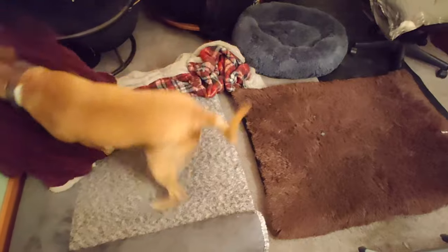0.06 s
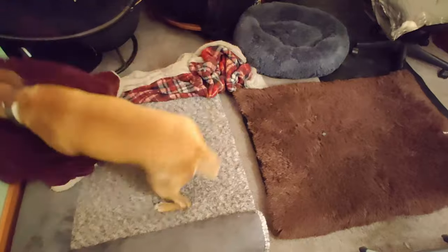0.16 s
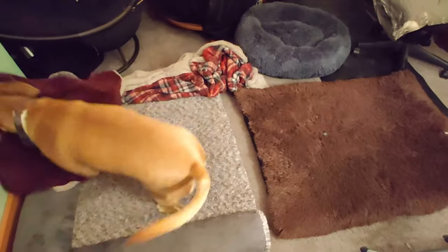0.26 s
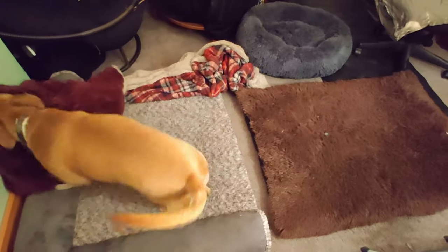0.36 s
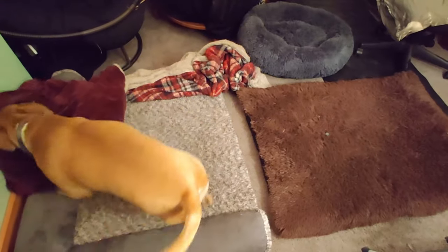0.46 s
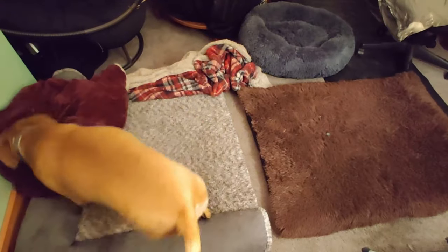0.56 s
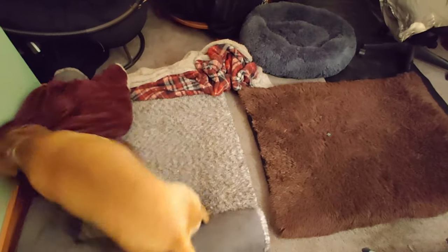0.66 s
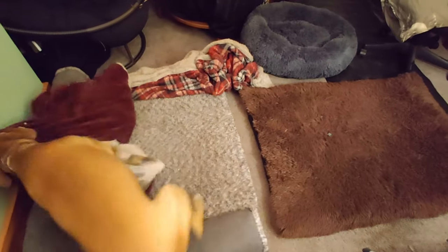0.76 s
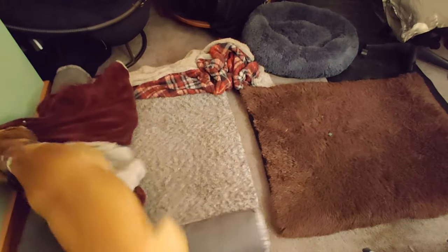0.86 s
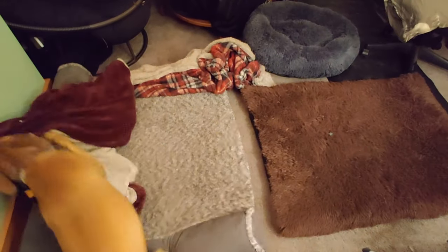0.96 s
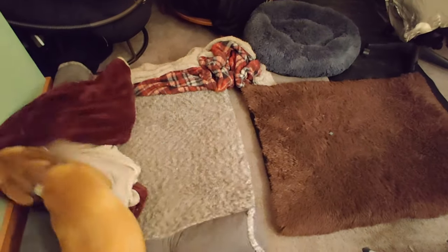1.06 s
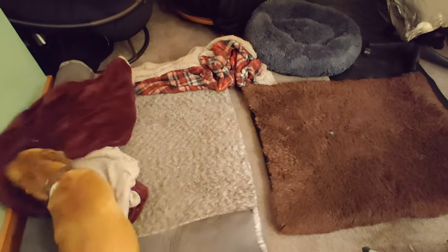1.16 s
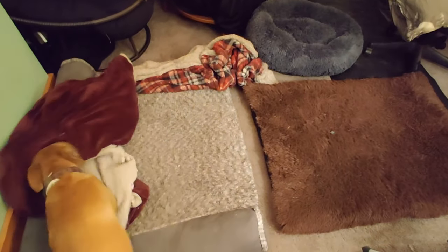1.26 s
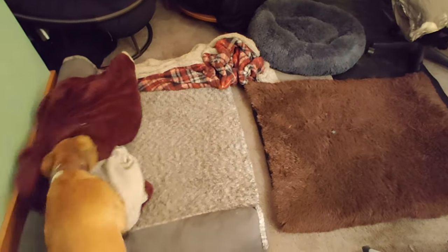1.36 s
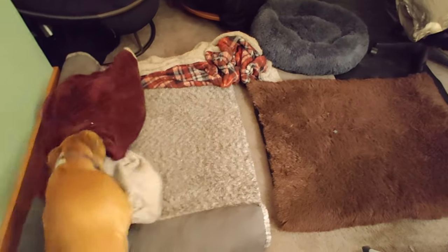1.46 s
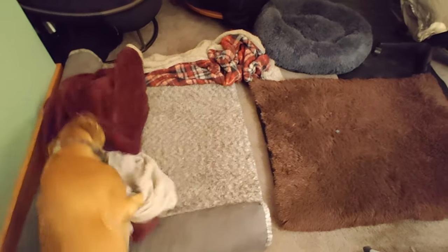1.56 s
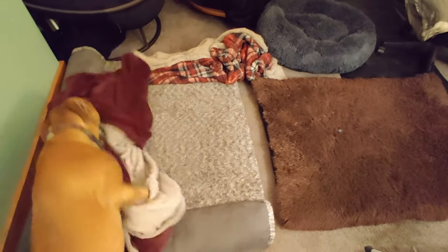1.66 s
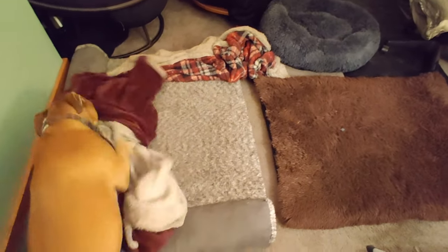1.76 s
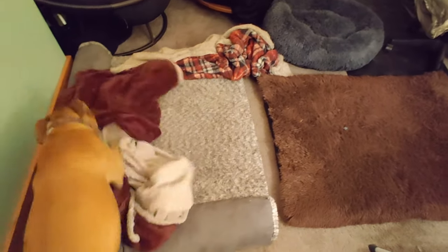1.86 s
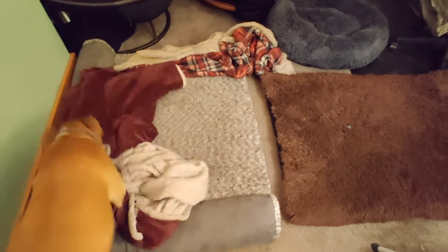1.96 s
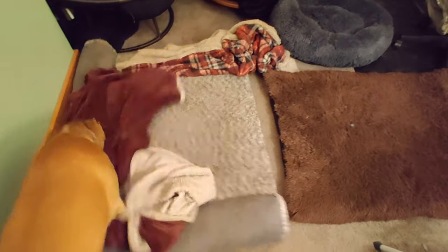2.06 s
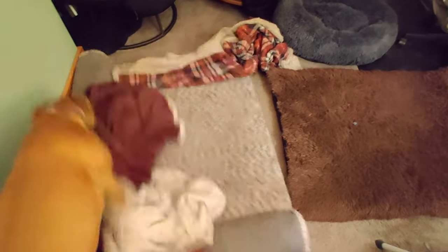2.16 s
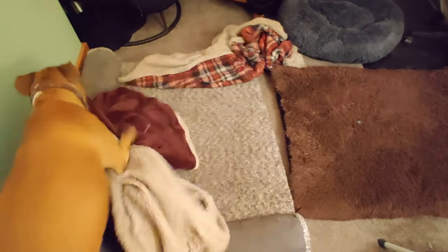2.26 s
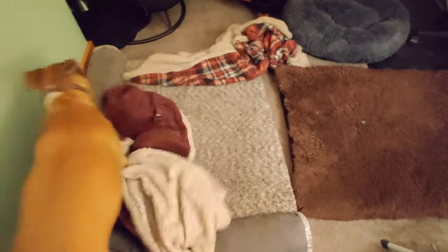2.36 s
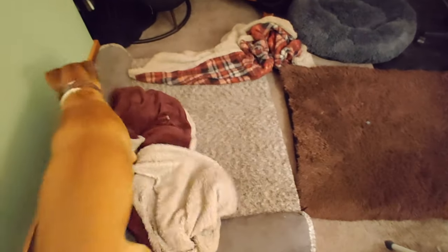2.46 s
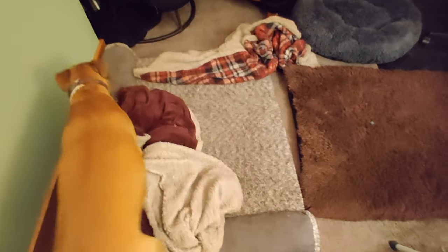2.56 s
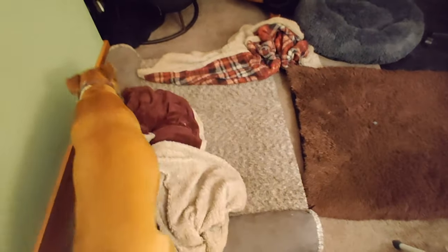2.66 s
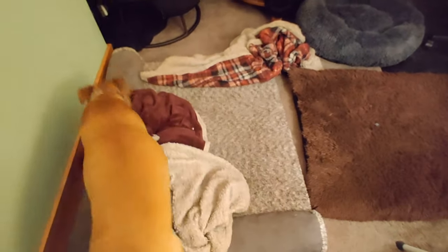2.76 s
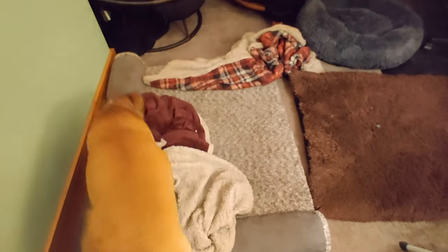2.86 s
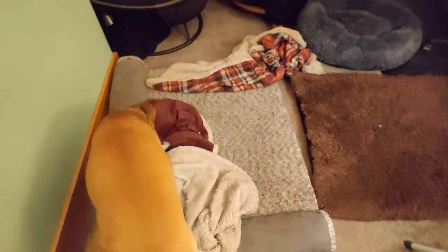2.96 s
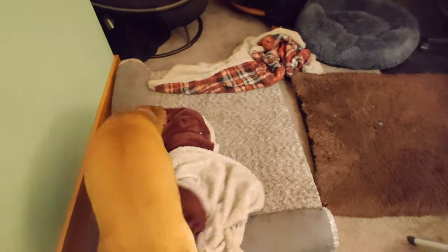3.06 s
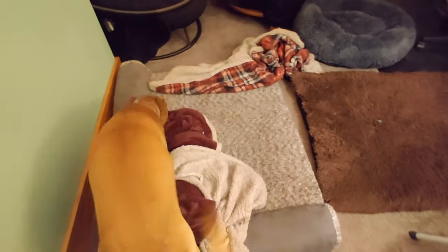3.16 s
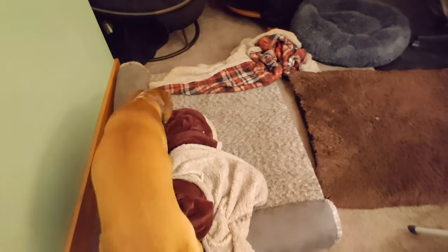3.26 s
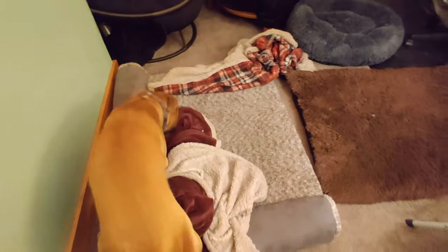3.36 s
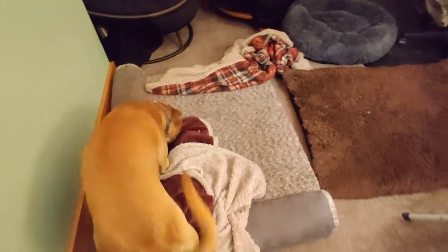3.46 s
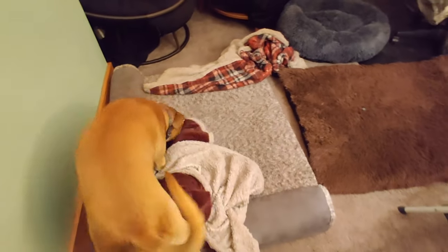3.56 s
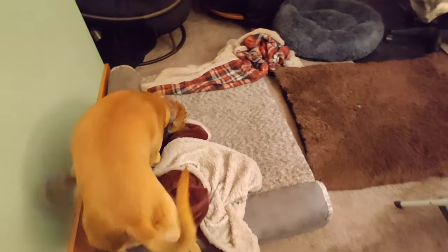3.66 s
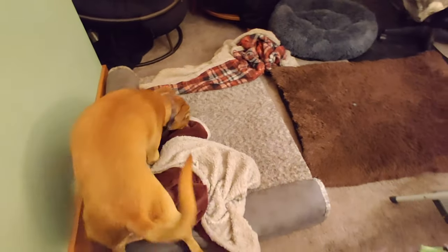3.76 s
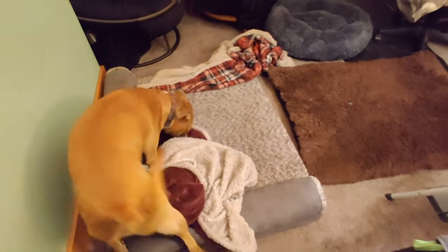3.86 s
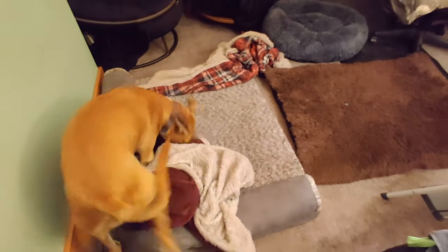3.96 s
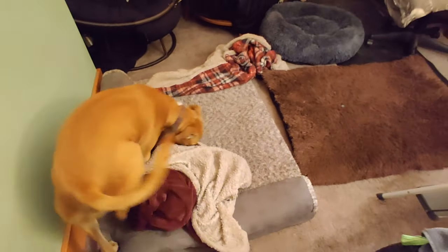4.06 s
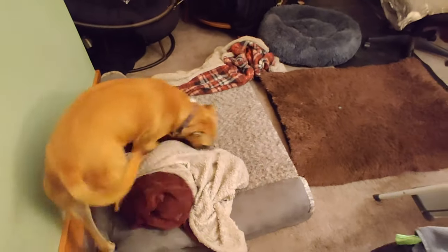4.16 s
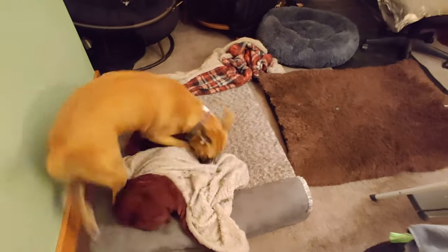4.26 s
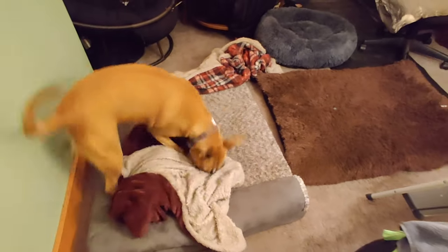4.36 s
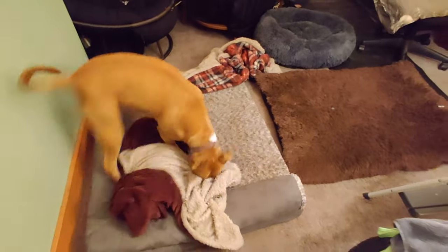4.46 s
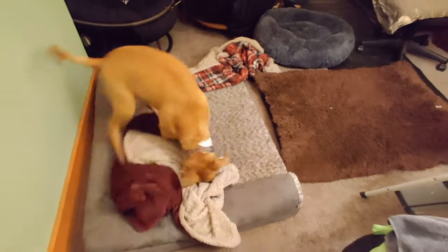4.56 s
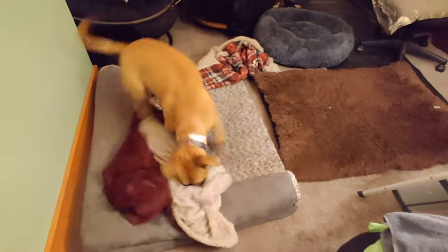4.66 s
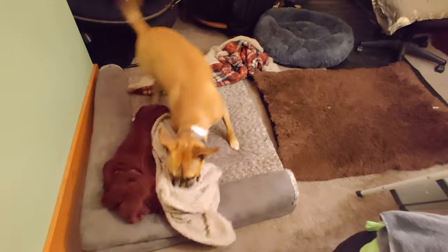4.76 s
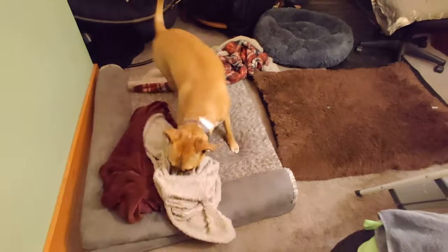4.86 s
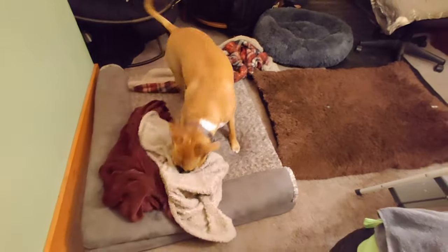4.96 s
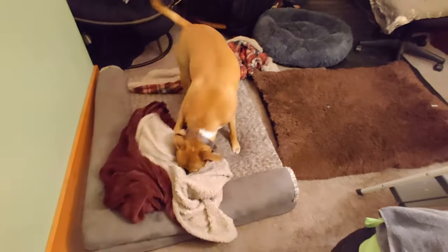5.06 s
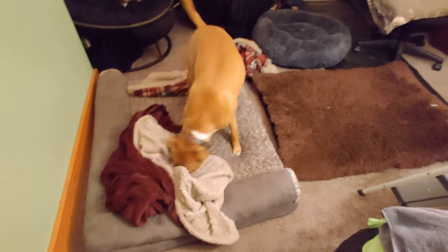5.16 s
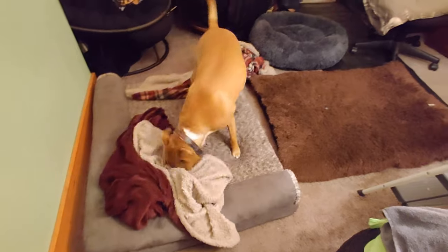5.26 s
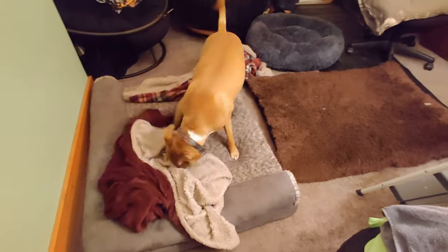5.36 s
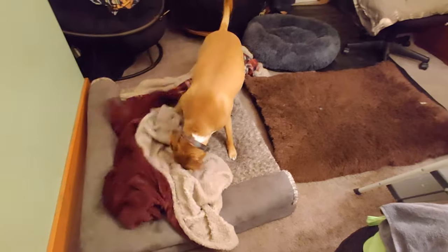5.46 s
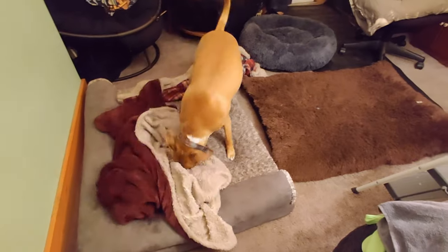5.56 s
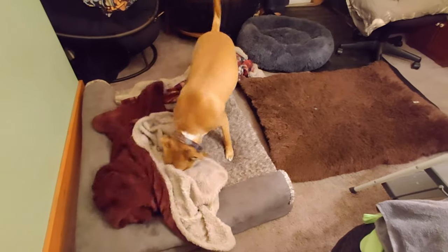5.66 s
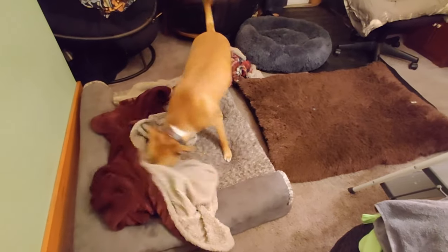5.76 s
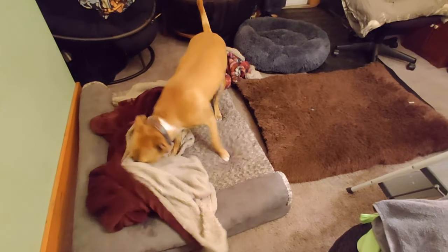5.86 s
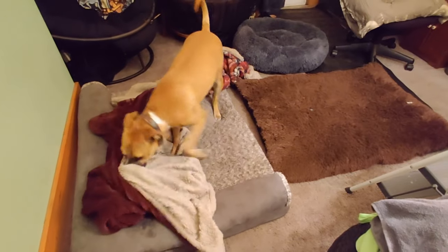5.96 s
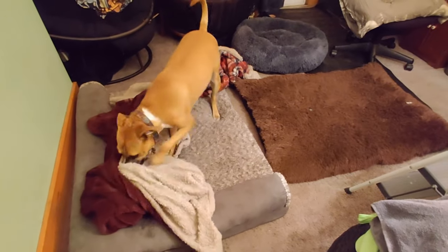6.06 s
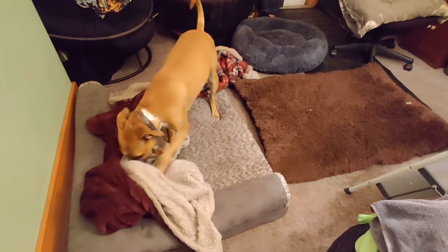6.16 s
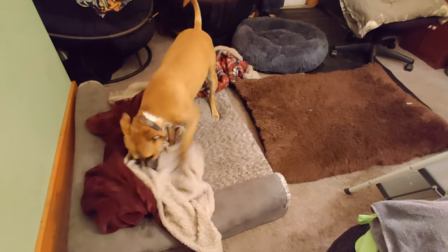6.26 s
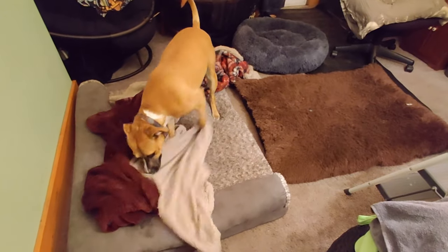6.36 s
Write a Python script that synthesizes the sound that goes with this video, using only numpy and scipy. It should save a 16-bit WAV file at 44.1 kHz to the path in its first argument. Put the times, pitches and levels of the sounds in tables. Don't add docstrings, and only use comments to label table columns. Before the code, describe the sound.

Close in a small carpeted room, a dog works at blankets on a padded bed. Collar tags jingle, then paw blows and harsh claw rasps peak just after one second. Softer rubbing and digging follow, with dull finger taps on the recorder, more tag jingles, quieter nosing, and one short low grunt near the end. Faint hum and rumble lie underneath, in handheld stereo with the dog nearer the left.

```python
import sys
import numpy as np
from scipy import signal
from scipy.fft import rfft, irfft
from scipy.io import wavfile
from scipy.ndimage import uniform_filter1d

SR = 44100
rng = np.random.default_rng(int(sys.argv[2]) if len(sys.argv) > 2 else 0)


def dump(signal):
    limited = np.clip(np.atleast_2d(signal).T, -1, 1)
    pcm = np.round(limited * 32767).astype(np.int16)
    wavfile.write(sys.argv[1], SR, pcm)


def voltage_ratio(decibels):
    exponent = np.asarray(decibels, float) / 20
    return 10 ** exponent


N = 282365
TIME_S = np.arange(N) / SR

# (frequency [Hz], level [dB], T60 [s])
PADDING_MODES = [(83.01, 5.5, 0.0721), (159.02, 1, 0.10444), (217.79, -6, 0.08702), (283.29, -5.5, 0.12915),
                 (335.3, -10, 0.15687), (422.11, -5, 0.06733)]
# (time [s], pitch [Hz], level [dB], mouth opening [dB])
GRUNT_COURSE = [
    (5.501, 87.95, -65, -14.5),
    (5.527, 85.68, -41, -12.5),
    (5.561, 81.53, -37, 10),
    (5.593, 79.98, -44, 11.5),
    (5.63, 79.93, -40, -9.5),
    (5.67, 78.33, -34.5, -7.5),
    (5.7, 80.87, -31.5, -1),
    (5.73, 76.87, -43, -4.5),
    (5.77, 71.17, -68.5, 0),
]


def rms_one(x):
    return x / np.sqrt(np.mean(x ** 2) + 1e-20)


def in_time(rows):
    s, *columns = np.transpose(rows)
    return [np.interp(TIME_S, s, column) for column in columns]


def at_hz(points, hz):
    points_hz, values = np.transpose(points)
    return np.interp(np.log(hz), np.log(points_hz), values)


def band(x, low_hz, high_hz):
    edges_hz = [low_hz, min(high_hz, .45 * SR)]
    return signal.sosfilt(signal.butter(2, edges_hz, "band", fs=SR, output="sos"), x)


def lowpass(x, order, cutoff_hz):
    return signal.sosfilt(signal.butter(order, cutoff_hz, fs=SR, output="sos"), x)


def drift(rate_hz):
    r = np.exp(-80 * np.pi * rate_hz / SR)
    noise = rng.standard_normal(N // 40 + 2002)
    slow = signal.lfilter([1], [1, -2 * r, r * r], noise)[2000:]
    return np.interp(np.arange(N) / 40, np.arange(len(slow)), rms_one(slow))


def ring(x, hz, t60_s):
    r = voltage_ratio(-60 / (t60_s * SR))
    w = 2 * np.pi * hz / SR
    return signal.lfilter([0, np.sin(w)], [1, -2 * r * np.cos(w), r * r], x + 1e-18)


def resonance(x, hz, width_hz):
    r = np.exp(-np.pi * width_hz / SR)
    zeros = np.array([1, 0, -1]) * (1 - r * r) / 2
    return signal.lfilter(zeros, [1, -2 * r * np.cos(2 * np.pi * hz / SR), r * r], x)


def clicks(times_s, heights):
    out = np.full(N, 1e-18)
    np.add.at(out, np.round(np.asarray(times_s) * SR).astype(int), heights)
    return out


def grains(per_s, spread_db):
    sizes = voltage_ratio(spread_db * np.minimum(rng.exponential(1, N), 4)) * rng.choice([-1, 1], N)
    return rms_one(sizes * (rng.random(N) < per_s / SR))


def port_grains(per_s, spread_db):
    return np.array([grains(per_s, spread_db) for port in range(2)])


def moves(s, peak_db, fade_s, rise, rest_db):
    t = np.arange(0, N + 64, 64) / SR
    late = (t - s[:, None]) / np.maximum(fade_s, .005)[:, None]
    level_db = np.max(peak_db[:, None] - 10 * np.maximum(late, -late / rise), axis=0)
    return np.interp(TIME_S, t, np.maximum(level_db, rest_db))


def shove_levels():
    # (time [s], padding [dB], cloth over padding [dB], 10 dB fade [s])
    shove_rows = [(.08, -57.5, 2, 0.5374), (0.338, -58, 9, 0.2354), (0.621, -45.5, 11.5, -0.4593),
                  (0.707, -48, 1, -0.0002), (0.874, -42.5, 9.5, 0.0971), (1, -50, 0, -0.2151),
                  (1.12, -42, 6, 0.3719), (1.161, -43.5, 21, 0.0478), (1.21, -30, 6.5, 0.0074),
                  (1.37, -41, 5, 0.1277), (1.47, -51, 0.5, -0.0697), (1.75, -56.5, -1, 0.6039),
                  (2.011, -52.5, 16, 0.0064), (2.066, -47, 9, .03), (2.154, -41, 1.5, 0.1779),
                  (2.44, -54.5, -14, -0.124), (2.92, -51.5, -20, 0.469), (2.961, -44, 11, -0.0662),
                  (3.044, -42.5, 4.5, 0.0348), (3.231, -49, 0, 0.1547), (3.64, -55, 0, 0.5475),
                  (3.94, -42, -7, -0.0442), (4.169, -57, 20.5, 0), (4.243, -44, -9.5, 0.2318),
                  (4.56, -51.5, -14.5, 0.459), (4.75, -54, 10, .06), (5.0, -53.5, 13, -0.0583),
                  (5.5, -54, -29, 0.535), (5.603, -28.5, -36, 0.0903), (5.78, -48, 4, 0.1224),
                  (6.351, -60, 7, 0.5049)]
    s, shove_db, over_db, fade_s = np.transpose(shove_rows)
    padding_db = moves(s, shove_db, fade_s, rise=0.6247, rest_db=-64.5)
    cloth_db = moves(s, shove_db + over_db, 0.6537 * fade_s, rise=0.7763, rest_db=-66.5)
    return padding_db, cloth_db


def scuff_course():
    # (time [s], level [dB], pitch [Hz], 10 dB fade [s])
    scuff_rows = [(.25, -55.5, 2134, -0.1093), (0.621, -51, 1826, 0.019), (.71, -50.5, 2274, 0.0952),
                  (0.866, -33, 1017, 0.0135), (0.897, -40.5, 2084, 0.0505), (1.0, -56, 1531, 0.1967),
                  (1.131, -36, 1553, 0.1324), (1.156, -27, 1174, 0.0454), (1.26, -43.5, 2800, 0.09),
                  (1.316, -46, 2500, 0.09), (1.36, -42, 1898, 0.1168), (1.389, -25.5, 1563, 0.0086),
                  (1.56, -53, 2546, 0.0912), (1.852, -46.5, 2393, -0.4573), (2.055, -42.5, 2378, 0.0205),
                  (2.107, -36, 2424, 0.0541), (2.16, -40.5, 2025, 0.0253), (2.37, -58.5, 2459, 0.3779),
                  (2.9, -58, 2254, 0.171), (2.97, -51, 1858, 0.1971), (3.23, -45, 2288, -0.0715),
                  (3.351, -55, 1830, 0.1638), (3.629, -52.5, 1700, 0.0641), (3.926, -51.5, 1278, 0.0378),
                  (4.17, -53, 2347, 0.052), (4.2, -58.5, 1959, 0.3571), (4.26, -52, 1542, 0.2052),
                  (4.56, -58.5, 1861, 0.2647), (5.501, -49.5, 2482, 0), (5.7, -52.5, 795.4, 0.1224),
                  (5.79, -55, 1883, 0.1571)]
    s, claw_db, claw_hz, fade_s = np.transpose(scuff_rows)
    return moves(s, claw_db, fade_s, rise=0.72145, rest_db=-106), np.interp(TIME_S, s, claw_hz)


def claw_rasp(scuff_hz):
    shared = grains(per_s=3500, spread_db=3.0)
    own = port_grains(per_s=3500, spread_db=3.0)
    jerks = voltage_ratio(1.758 * drift(28.17))
    rasp = 0
    for hz in np.geomspace(800, 5000, 9):
        octaves = np.log2(hz / scuff_hz)
        hump_db = 6.285 * np.exp(-(octaves / 1.0192) ** 2) - 2.901 * np.log2(hz / 800)
        gain_db = hump_db + 1.2 * drift(11)
        slips = jerks * (shared + (hz / 1000) ** 2 * own)
        strip = resonance(resonance(slips, hz, .45 * hz), hz, .45 * hz)
        rasp = rasp + voltage_ratio(gain_db) * rms_one(strip)
    return band(band(rasp, 587.1, 5188.7), 369.5, 5434.4)


def rubbing(padding_db, cloth_db, scuff_db, scuff_hz):
    shoves = grains(per_s=410, spread_db=2.5)
    shaken = sum(voltage_ratio(db) * ring(shoves, hz, 0.6841 * t60_s) for hz, db, t60_s in PADDING_MODES)
    padding = band(shaken, 54.684, 946.6)
    cloth = band(band(grains(per_s=900, spread_db=3.5), 271.96, 578.6), 223.13, 1273.4)
    body = voltage_ratio(padding_db) * rms_one(padding) + voltage_ratio(cloth_db - 9.5) * rms_one(cloth)
    still = 1 - .75 * (TIME_S > GRUNT_COURSE[1][0]) * (TIME_S < GRUNT_COURSE[-2][0])
    scuff = voltage_ratio(scuff_db - 4.0) * rms_one(claw_rasp(scuff_hz))
    return uniform_filter1d(still, size=800) * body + scuff


def singing():
    # (time [s], level [dB], pitch [Hz], 10 dB fade [s])
    sing_rows = [(1.125, -40.5, 1012, 0.0448), (1.15, -29, 1120, 0.002), (1.2, -55, 2017, 0.0214),
                 (1.254, -43.5, 2430, 0.0138), (1.28, -48.5, 2350, 0.0462), (1.308, -47.5, 2076, 0.0443),
                 (1.385, -34.5, 1000, -0.012), (2.07, -48.5, 2200, 0.0565), (2.135, -47, 2448, 0.0418),
                 (2.76, -63.5, 2404, 0.0883), (3.917, -50.5, 1050, -0.0058), (4.132, -58, 801, -0.0057),
                 (4.2, -67.5, 2398, 0.0136), (5.0, -64, 799.5, 0.2186)]
    s, level_db, hz, fade_s = np.transpose(sing_rows)
    turns = 2 * np.pi * np.cumsum(np.interp(TIME_S, s, hz)) / SR
    a, b = lowpass(rng.standard_normal((2, 2, N)), 2, 188.4)
    rough = a * np.cos(turns) + b * np.sin(turns)
    return voltage_ratio(moves(s, level_db, fade_s, rise=0.4893, rest_db=-120)) * rms_one(rough)


def fibres(scuff_db):
    level = voltage_ratio(-48 + 0.3755 * scuff_db) * (scuff_db > -55)
    return level * band(rng.standard_normal((2, N)), 7773, 12680)


def blows():
    # (time [s], peak [dB], deep padding [dB over peak], upper padding [dB over peak], claw snap [dB over peak])
    blow_rows = [(0.609, -47, -18.5, 3, -18), (0.827, -51.5, 10.5, -9.5, -5), (0.859, -26, -3, 3.5, -28.5),
                 (1, -45, 9, -30, -11), (1.161, -7.5, -57.5, -14.5, -29.5), (1.172, -23, 1, 2, -12.5),
                 (1.385, -36, -8, 11, -4), (1.397, -21, -15, 1.5, -41.5), (1.998, -49.5, 10.5, 12.5, -21.5),
                 (2.047, -35.5, -2, -1.5, 2.5), (2.14, -30.5, 2, -0.5, -15), (2.155, -31, 0, -5, -33),
                 (2.364, -51.5, -5.5, -24.5, -3), (2.974, -31.5, -9, -7, -21.5),
                 (3.164, -55, 11.5, -5.5, -7.5), (3.205, -49, -16.5, 4, -11), (3.593, -48.5, 9.5, 7, -16),
                 (3.8, -50, -3, 2, -16), (3.918, -46, -16.5, -4.5, -10), (3.952, -45.5, -4, -2.5, -29.5),
                 (4.132, -48, -20.5, -12.5, -25), (4.169, -35, -34, -30, -16), (4.75, -45, 0.5, -8.5, -20),
                 (4.998, -48, -1.5, -12.5, -36.5), (5.687, -52.5, -8.5, -7.5, -18),
                 (6.255, -53, 7.5, 1, -20.5), (6.337, -55.5, 10, -21, -11)]
    s, peak_db, deep_db, upper_db, snap_db = np.transpose(blow_rows)
    pulse = band(ring(clicks(s, voltage_ratio(peak_db + 6)), 1000, .0035), 150, 3500)
    snap = band(ring(clicks(s, voltage_ratio(peak_db + snap_db + 19.0)), 2450.5, 0.006002), 810.8, 3293.5)
    snap = .5 * snap + room(snap, t60_s=.012, gap_s=0)
    thump = 0
    for k, (hz, db, t60_s) in enumerate(PADDING_MODES):
        mode_db = deep_db if k < 3 else upper_db
        chance_db = rng.normal(0, 2.5, len(s))
        hits = clicks(s + 0.0014393, voltage_ratio(peak_db + mode_db + db + chance_db))
        thump = thump + ring(hits, hz, t60_s)
    return pulse + snap + band(thump, 90.41, 681)


def shake_level():
    # (time [s], level [dB], 10 dB fade [s], 10 dB rise [s])
    shake_rows = [(.3, -70, .1, .08), (.61, -72.5, 0.7451, 0.1465), (.704, -59, 0.1, .001),
                  (0.88, -53.5, 0.1463, 0.0661), (.911, -57, 0.1805, 0.0921), (1.002, -74, 1.0309, 0.2657),
                  (1.845, -66, 0.3122, 0.021), (2.365, -67, 0.0962, 0.0629), (2.87, -65, 0.1069, 0.0056),
                  (3.005, -63, 0.0143, 0.0227), (3.026, -54.5, 0.0366, 0.0012),
                  (3.221, -63.5, 0.0536, 0.0227), (3.3365, -53, 0.0616, 0.0065),
                  (3.353, -52.5, 0.0981, 0.0215), (3.517, -70, 0.2415, 0.0053), (3.632, -67, 0.18, -0.0086),
                  (4.034, -62.5, 0.1911, 0.0384), (4.1, -64.5, 0.1518, 0.07), (4.29, -65, 0.0046, 0.1824),
                  (4.35, -60, -0.0166, 0.1526), (4.415, -62, 0.0222, 0.1387), (4.465, -56, -0.0006, .05),
                  (4.63, -72, 0.3, 0.178), (5.04, -72, 0.1148, -0.1482), (5.4875, -51, 0.0097, -0.0553),
                  (5.502, -51, 0.0127, -0.0308), (5.532, -53, .03, .04), (5.583, -61.5, 0.0195, -0.0943),
                  (5.596, -59.5, 0.0506, -0.1095), (5.78, -66, 0.0584, 0.0209),
                  (5.983, -55, -0.0721, -0.142), (6.123, -61, -0.2616, -0.1055),
                  (6.319, -60.5, 0.1555, -1.1065)]
    s, level_db, fade_s, rise_s = np.transpose(shake_rows)
    rise = np.maximum(rise_s / fade_s, .01)[:, None]
    return moves(s, level_db, fade_s, rise, rest_db=-117)


def tags(rattle_db):
    # (time [s], click [dB], low mode [dB], middle modes [dB])
    strike_rows = [(0.318, -59, -77, -70), (0.4993, -63.5, -75, -80.5), (0.6107, -62, -70, -72),
                   (0.6734, -66, -66, -73), (0.6856, -49, -55.5, -61.5), (0.7037, -32.5, -50.5, -42),
                   (0.7215, -54.5, -54, -54.5), (0.8792, -43, -47.5, -51.5), (0.91, -31, -48, -40.5),
                   (0.9247, -35.5, -57, -41), (1.0023, -43.5, -58.5, -79.5), (1.6644, -75.5, -76, -80.5),
                   (1.8264, -70.5, -72, -64.5), (1.8427, -60, -50, -58.5), (1.8684, -63.5, -58.5, -54),
                   (1.8917, -61.5, -56.5, -61.5), (2.3652, -38, -54, -54), (2.3818, -64, -62, -61.5),
                   (2.6053, -66.5, -93.5, -68), (2.78, -54, -77.5, -77.5), (2.8665, -62.5, -77, -66),
                   (3.0032, -58.5, -57, -50.5), (3.0224, -42.5, -52, -53.5), (3.2172, -72, -54.5, -61.5),
                   (3.3361, -48.5, -48, -44.5), (3.3466, -40.5, -45, -40), (3.351, -33.5, -52, -37),
                   (3.3711, -50, -58.5, -57.5), (3.386, -55, -58, -48), (3.5146, -51.5, -56.5, -40),
                   (3.5332, -62, -47.5, -49), (3.6144, -59.5, -59.5, -59.5), (3.634, -52, -48.5, -54),
                   (3.649, -60, -53.5, -53), (3.7713, -67.5, -76, -78),
                   (4.034, -64, -62, -60), (4.0632, -59.5, -61, -48), (4.0976, -47.5, -56, -50),
                  (4.109, -52.5, -52.5, -51), (4.1626, -69, -71.5, -66), (4.1944, -60.5, -64.5, -66.5),
                  (4.2871, -66, -65, -65), (4.3193, -56, -71, -70.5), (4.3452, -47.5, -59, -60),
                  (4.41, -55.5, -60.5, -63.5), (4.4408, -61.5, -63.5, -50), (4.468, -55.5, -56.5, -53.5),
                  (4.496, -73, -72, -64.5), (4.629, -70.5, -66.5, -72.5), (4.6948, -69, -55, -69.5),
                  (4.7748, -57, -67.5, -67.5), (5.042, -75.5, -66.5, -73.5), (5.082, -71, -60.5, -75),
                  (5.3, -78.5, -88, -79.5), (5.369, -75, -76, -68.5), (5.4885, -47, -53.5, -46.5),
                  (5.5018, -45, -53.5, -42), (5.517, -45, -60, -42), (5.5683, -64, -76.5, -53.5),
                  (5.584, -59.5, -60.5, -65.5), (5.594, -45, -68.5, -64), (5.7232, -66, -70, -66),
                  (5.777, -56, -73, -65.5), (5.79, -57, -62, -61), (5.978, -50, -55, -58),
                  (6.0058, -53, -62.5, -48.5), (6.056, -76, -64.5, -48.5), (6.1198, -66.5, -74, -52),
                  (6.319, -60, -68, -60.5)]
    # (time [s], high modes [dB], upper modes [dB], top modes [dB])
    tinkle_rows = [(0.3187, -68, -75.5, -84.5), (0.6852, -54.5, -71.5, -68), (0.7038, -49, -53.5, -44.5),
                   (0.7216, -57, -52, -59.5), (0.7794, -83, -82, -76), (0.8809, -43, -63.5, -69),
                   (0.9095, -39, -59, -47.5), (0.9253, -39.5, -66, -58.5), (1.8462, -60, -76, -66.5),
                   (1.867, -71, -76.5, -71.5), (1.892, -50, -65.5, -73.5), (2.364, -62, -77, -71.5),
                   (2.78, -78.5, -85.5, -80), (2.8689, -65, -80, -76), (3.0066, -54.5, -67.5, -63),
                   (3.0243, -39, -63.5, -61.5), (3.2181, -80, -84, -80), (3.336, -47, -54, -54),
                   (3.3525, -37, -51.5, -50), (3.3719, -39, -52.5, -47), (3.5153, -43, -58.5, -68.5),
                   (3.5545, -54.5, -77, -68.5), (3.6161, -58.5, -71, -76.5), (3.6345, -51, -64, -70.5),
                   (3.6542, -46.5, -53.5, -57), (4.0331, -67, -68, -74.5), (4.0643, -58.5, -62.5, -65.5),
                   (4.0979, -55, -72, -59.5), (4.1613, -73.5, -78, -77.5), (4.2404, -69.5, -68, -77),
                   (4.2874, -69.5, -75.5, -72), (4.3495, -63, -63, -66.5), (4.4139, -57, -73.5, -61.5),
                   (4.4404, -55, -70.5, -60.5), (4.455, -55.5, -66.5, -55), (4.4702, -55.5, -66.5, -56),
                   (4.6285, -64, -80, -83.5), (4.6929, -65, -85.5, -73.5), (5.369, -72.5, -86, -85),
                   (5.4886, -45, -59.5, -48.5), (5.5011, -42, -59.5, -47), (5.5295, -49, -55.5, -55.5),
                   (5.5821, -59, -66, -77), (5.7233, -69.5, -85, -73.5), (5.7763, -66, -73, -89.5),
                   (5.7898, -53.5, -68.5, -74.5), (5.979, -55, -52, -61), (6.0072, -53, -57.5, -59.5),
                   (6.123, -68, -77, -79.5), (6.3209, -64.5, -71, -76.5)]
    # (frequency [Hz], level [dB], T60 [s])
    low_modes = [(4912, 0, .33), (5350, -18, .05), (5950, -20, .06)]
    # (frequency [Hz], level [dB], T60 [s])
    middle_modes = [(7885, 0, 0.19), (7838, -7, 0.16), (7420, -24, 0.08)]
    # (frequency [Hz], level [dB], T60 [s])
    high_modes = [(12185, 0, .14), (12300, -10, .08)]
    # (frequency [Hz], level [dB], T60 [s])
    upper_modes = [(13200, 0, .1), (13060, -8, .07)]
    # (frequency [Hz], level [dB], T60 [s])
    top_modes = [(15620, 0, .1), (15450, -6, .07), (14300, -15, .05)]
    group_right_db = [-7, -4, 1.5, 7.5, 10.5]
    s, click_db, low_db, middle_db = np.transpose(strike_rows)
    small_s, high_db, upper_db, top_db = np.transpose(tinkle_rows)

    chatter = voltage_ratio(rattle_db + 1.84 * drift(48.9)) * port_grains(per_s=5500, spread_db=3.0)
    touching = np.clip((rattle_db + 74) / 16, .05, 1)
    pressed = touching[((s - .006) * SR).astype(int)]
    skid_t60_s = 0.024
    strikes = clicks(s, voltage_ratio(click_db - 9 * pressed))
    burst = signal.lfilter([1], [1, -voltage_ratio(-60 / (skid_t60_s * SR))], strikes)
    skid = burst * port_grains(per_s=9000, spread_db=3)
    out = voltage_ratio(2.0) * band(skid, 2376, 14350) + voltage_ratio(4.0) * band(chatter, 1670.8, 9533)
    out += voltage_ratio(-1.5) * resonance(chatter, 5950, 250)
    out += voltage_ratio(4.0) * resonance(chatter, 7674.7, 559.5)
    out += resonance(chatter, 12846, 1600)
    groups = [(low_modes, s, low_db + 1.5), (middle_modes, s, middle_db + 6.0),
              (high_modes, small_s, high_db - 0.5), (upper_modes, small_s, upper_db + 5.0),
              (top_modes, small_s, top_db + 6.5)]
    for group, right_db in zip(groups, group_right_db):
        out = out + ringing(*group, right_db, chatter, touching)
    return out


def ringing(modes, s, strike_db, right_db, chatter, touching):
    free_ring_s, fur_damping_db_per_s, rubbed_damping = .085, 500, 0.3342
    last = np.searchsorted(s, TIME_S) - 1
    since_s = np.where(last >= 0, TIME_S - s[last], 9)
    damped_db = fur_damping_db_per_s * np.maximum(since_s - free_ring_s, 0)
    lasting = 1 - rubbed_damping * touching[((s + .01) * SR).astype(int)][last]
    out = 0
    for k, (hz, db, t60_s) in enumerate(modes):
        struck_db = strike_db + db + k * rng.normal(0, 2, len(s))
        fade_db = struck_db[last] - 60 * since_s / (t60_s * lasting) - damped_db
        fade = signal.lfilter([.04], [1, -.96], voltage_ratio(fade_db))
        turning = np.array([0 * TIME_S, 1.5 * drift(9)]) + 1.1 * touching * drift(90)
        flutter = voltage_ratio(5 * touching * drift(120) + 1.2 * drift(35))
        tone = fade * np.sin(2 * np.pi * hz * TIME_S + turning) * flutter
        out = out + tone + voltage_ratio(db - 29.5) * ring(chatter, hz, 0.2552 * t60_s)
    return out * voltage_ratio([[0], [right_db]])


def grunt():
    # (frequency [Hz], width [Hz], level [dB])
    throat = [(84.5, 57.93, 4), (194.73, 22.5, 9), (316, 28.22, 20.5), (490, 110, -34.5)]
    pitch_hz, level_db, open_db = in_time(GRUNT_COURSE)
    turns = np.cumsum(pitch_hz * (1 + 0.0594 * drift(39.52))) / SR
    pulses = -np.diff(np.floor(turns), prepend=0) * voltage_ratio(2.398 * drift(61))
    parts = [voltage_ratio(db) * (-1) ** k * resonance(pulses, hz, width_hz)
             for k, (hz, width_hz, db) in enumerate(throat)]
    chest = rms_one(band(parts[0] + parts[1], 52, 430))
    mouth = rms_one(band(band(parts[2] + parts[3], 200, 650), 150, 650))
    inside_s = np.minimum(TIME_S - GRUNT_COURSE[0][0], GRUNT_COURSE[-1][0] - TIME_S)
    gate = np.clip(inside_s / 0.01477, 0, 1)
    return gate * voltage_ratio(level_db - 0.5) * (voltage_ratio(-open_db / 2) * chest + voltage_ratio(open_db / 2 - 6.0) * mouth)


def taps():
    # (time [s], peak [dB], pitch [Hz])
    tap_rows = [
        (1.766, -34.5, 195.5),
        (2.447, -30.5, 182.9),
        (2.487, -44, 350),
        (2.528, -34.5, 295.8),
        (2.56, -44, 483.6),
        (2.951, -15.5, 390.7),
    ]
    out = 0
    for s, peak_db, hz in tap_rows:
        touch = clicks([s], -voltage_ratio(peak_db + 11.0))
        swing = resonance(ring(touch, hz, 3.5 / hz), hz, 2.5 * hz)
        tick = voltage_ratio(0.7377 * (peak_db + 20.5) - 6.5) * band(touch, 1962, 4448)
        out = out + swing + tick
    return out * voltage_ratio([[-26], [0]])


def room(x, t60_s, gap_s=0.0040392):
    t = np.arange(int(t60_s * SR)) / SR
    tail = rng.standard_normal((2, len(t))) * voltage_ratio(-60 * t / t60_s) * (t >= gap_s)
    tail /= np.sqrt(np.sum(tail ** 2, axis=1, keepdims=True))
    return signal.fftconvolve(x[None], tail, axes=1)[:, :N]


def house():
    # (frequency [Hz], density [dB per Hz])
    air_spectrum = [(20, -48.5), (40, -25), (65, -0.5), (125, -13.5), (180, -17), (360, -20), (437, -23.5),
                    (730, -21.5), (2240, -27), (4200, -31), (5080, -30), (6150, -43.5), (15000, -37.5),
                    (16500, -65.5)]
    # (frequency [Hz], left-right likeness [clipped to 0..1])
    likeness = [(60, 0.41), (240, -0.062), (950, -1.9), (3770, -0.5), (15000, -1.7)]
    # (frequency [Hz], wavers [per s], level [dB])
    motor_lines = [(58.73, 2.958, -50.5), (116.89, 3.144, -65), (179.75, 1.2546, -63.5)]
    # (time [s], level [dB])
    sway_rows = [(0.0, -62.5), (0.14, -43), (0.37, -58), (0.82, -40.5), (1.8, -60.5), (2.14, -38),
                 (2.76, -56), (3.03, -43.5), (3.19, -56.5), (4.81, -51.5), (4.99, -90), (5.29, -56.5),
                 (6.06, -62.5), (6.4, -62)]
    hz = np.maximum(np.arange(N // 2 + 1) * SR / N, 1)
    alike = np.clip(at_hz(likeness, hz), 0, 1)
    mid, side = rfft(rng.standard_normal((2, N))) * voltage_ratio(at_hz(air_spectrum, hz))
    common, apart = np.sqrt(1 + alike) * mid, np.sqrt(1 - alike) * side
    air = irfft(np.array([common + apart, common - apart]), N)
    hum = 0
    for line_hz, waver_hz, db in motor_lines:
        phase = 2 * np.pi * line_hz * TIME_S + 0.8148 * drift(waver_hz)
        hum = hum + voltage_ratio(db + 2.654 * drift(waver_hz)) * np.sin(phase)
    sway_hz = 19 * voltage_ratio(1.3 * drift(2.99))
    sway = np.sin(2 * np.pi * np.cumsum(sway_hz) / SR + np.array([[0], [.42]]))
    return voltage_ratio(-60) * rms_one(air) + hum + voltage_ratio(in_time(sway_rows)[0] + 2.5) * sway


def scene():
    paw_lag_s, tag_lag_s = .0002, .00015
    padding_db, cloth_db = shove_levels()
    scuff_db, scuff_hz = scuff_course()
    dog = rubbing(padding_db, cloth_db, scuff_db, scuff_hz) + singing() + blows() + grunt()
    dog = (dog + fibres(scuff_db)) * voltage_ratio([[.6], [-.6]])
    collar = tags(shake_level())
    heard = collar * voltage_ratio([[3.0], [-4.0]])
    right = np.roll(dog[1], round(paw_lag_s * SR)) + np.roll(heard[1], round(tag_lag_s * SR))
    near = np.array([dog[0] + heard[0], right])
    echo = room(voltage_ratio(-13) * band(dog[0], 70, 6000) + voltage_ratio(-13) * collar[0], t60_s=.2)
    return near + echo + house() + taps()


def top_cut(x):
    return signal.sosfilt(signal.butter(12, 17000, fs=SR, output="sos"), x)


def record(dry):
    # (frequency [Hz], width [Hz], level [dB])
    port_dip = (4225.6, 341.4, -7.5)
    left = dry[0] + (voltage_ratio(8.05) - 1) * resonance(dry[0], hz=5127.4, width_hz=361)
    right = dry[1] + (voltage_ratio(6.1393) - 1) * resonance(dry[1], hz=2173.8, width_hz=698.8)
    dull = lowpass(right, 1, 8286)
    both = np.array([left, 0.65612 * dull + 0.32083 * right])
    dip_hz, dip_width_hz, dip_db = port_dip
    both += (voltage_ratio(dip_db) - 1) * resonance(both, dip_hz, dip_width_hz)
    both = signal.sosfilt(signal.cheby2(14, 28, 15950, fs=SR, output="sos"), both)
    return top_cut(both)


dry = scene()
out = record(dry)
dump(out)
```